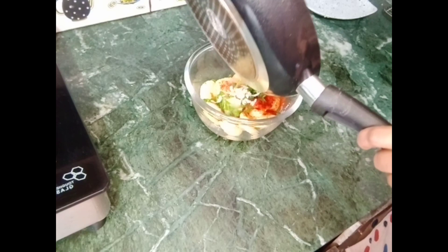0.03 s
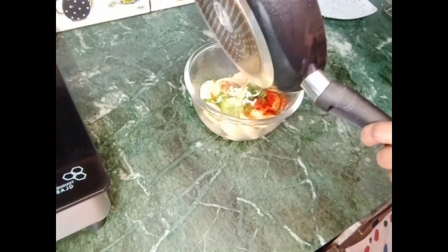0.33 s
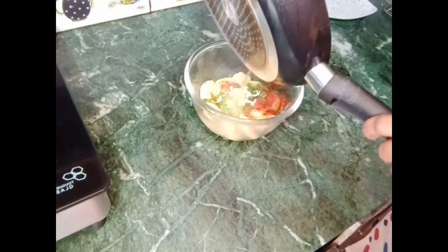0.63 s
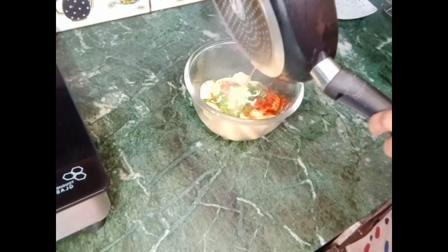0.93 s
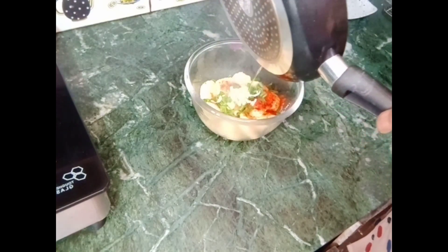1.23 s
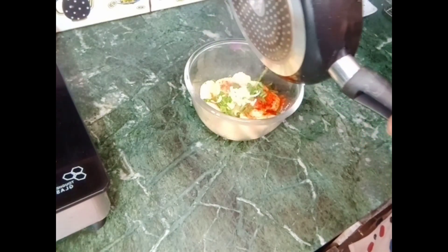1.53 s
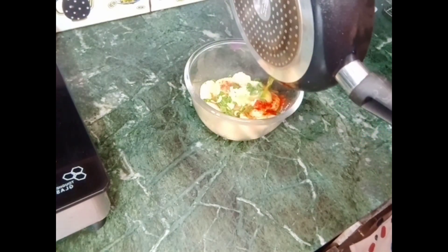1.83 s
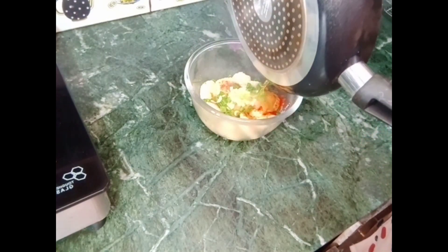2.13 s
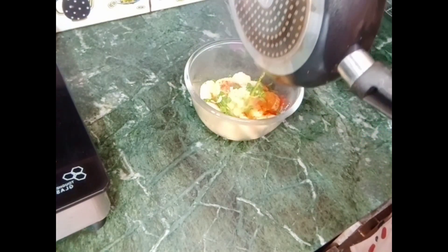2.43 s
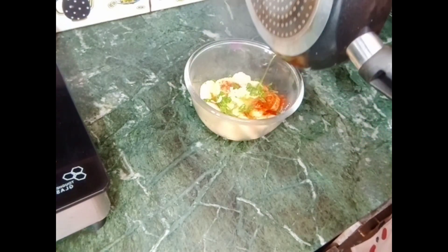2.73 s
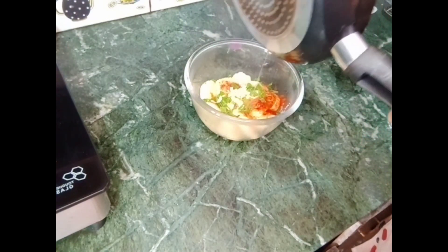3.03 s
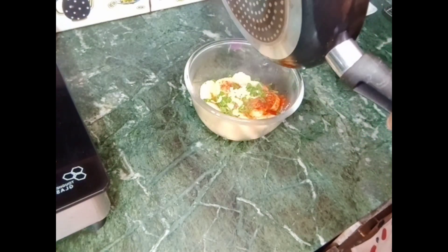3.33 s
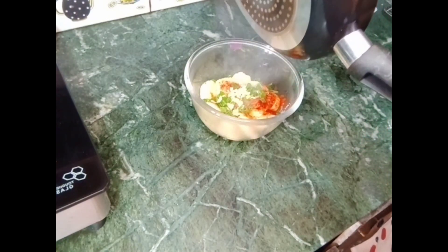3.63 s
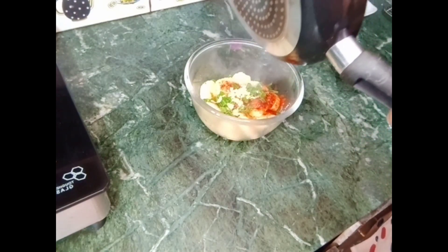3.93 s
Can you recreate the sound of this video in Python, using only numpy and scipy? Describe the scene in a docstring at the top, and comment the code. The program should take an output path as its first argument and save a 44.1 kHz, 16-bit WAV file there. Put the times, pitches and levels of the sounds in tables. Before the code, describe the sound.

Hot oil sizzles loudly as it is poured over chopped seasonings in a glass bowl, heard close in a small kitchen. A soft knock comes early; the sizzle surges with bubbling and pops, then fades to sparse ticks.

```python
"""A bright, dense sizzle: hot oil poured over chopped seasonings in a glass bowl on a stone counter.
Thousands of tiny steam bursts ring the bowl over a lower bubbling, surge with the pour and die away
when it ends, leaving the sparser ticks of the soaked seasonings. Pockets of steam gurgle and larger
drops pop. Something knocks once, the counter takes a soft bump, and the kitchen rumbles faintly."""
import sys
import numpy as np
from scipy import signal
from scipy.fft import rfft, irfft
from scipy.io import wavfile
from scipy.ndimage import uniform_filter1d

SR = 44100
rng = np.random.default_rng(int(sys.argv[2]) if len(sys.argv) > 2 else 0)


def transcribe(signal):
    """Save signal, clipped to [-1, 1], as a 16-bit WAV file at the path in sys.argv[1]."""
    frames = np.atleast_2d(signal).T
    limited = np.clip(frames, -1, 1)
    pcm = np.round(limited * 32767).astype(np.int16)
    wavfile.write(sys.argv[1], SR, pcm)


N = 176400
T = np.arange(N) / SR

# colour of the room rumble: f/Hz, level/dB
RUMBLE_COLOUR = [(20, -35), (40, -23), (65, -18), (100, 3.5), (140, -2), (190, -2.5), (240, -13),
                 (420, -14), (600, -20), (1200, -21.5), (2500, -39), (15000, -57)]
# colour of the steam bursts: f/Hz, level/dB
STEAM_COLOUR = [(200, -40.5), (800, -21.5), (2200, -19), (2700, -14), (3000, -11.5), (4000, -6.5),
                (5000, -2), (6000, -2), (7500, -2.5), (8500, -15), (10500, -18), (13500, -23.5),
                (14700, -8), (15500, -10)]
# resonances of the glass bowl: f/Hz, width/Hz, lift/dB
BOWL_RESONANCES = [(500, 45, 3), (875, 90, 6), (1010, 70, -3), (1120, 55, 6), (1245, 40, 6), (1580, 40, 5),
                   (2050, 420, -5), (2934, 45, 9), (3036, 40, 8), (3167, 40, 6), (3245, 60, -6),
                   (3322, 32, 7), (3436, 32, 8), (3564, 32, 6), (3823, 40, 5), (3960, 60, -3),
                   (4130, 130, 4), (5249, 30, 3), (5509, 30, 3), (5980, 220, 5), (6550, 300, -4),
                   (6970, 40, 3), (7209, 35, 4)]


def amp(db):
    """Decibels to gain."""
    return 10 ** (np.asarray(db) / 20)


def unit(x):
    """Scales to rms 1."""
    return x / np.sqrt(np.mean(x ** 2) + 1e-20)


def read(points, hz):
    """Reads a curve on a log-frequency axis."""
    f, value = np.transpose(points)
    return np.interp(np.log(hz + 1), np.log(f + 1), value)


def level(points):
    """A level curve as a gain for every sample."""
    return amp(np.interp(T, *np.transpose(points)))


def add(mix, s, sound):
    """Mixes a sound in at time s."""
    part = mix[round(s * SR):][:len(sound)]
    part += sound[:len(part)]


def wander(hz):
    """Slow random motion of rms 1, up to about hz."""
    f = np.fft.rfftfreq(N, 1 / SR)
    return unit(irfft(rfft(rng.standard_normal(N)) * f / (f + 2) / (1 + (f / hz) ** 2), N))


def coloured(x, colour, resonances=(), size=8192):
    """Plays x through a minimum-phase filter of unit energy, built from a colour and resonances."""
    hz = abs(np.fft.fftfreq(size, 1 / SR))
    peaks_db = sum(lift / (1 + (2 * (hz - f) / width) ** 2) for f, width, lift in resonances)
    log_gain = np.log(amp(read(colour, hz) + peaks_db))
    ring = np.fft.ifft(np.exp(np.conj(signal.hilbert(log_gain)))).real[:size // 2]
    return signal.oaconvolve(x, ring / np.linalg.norm(ring))[:N]


def above(x, edge_hz):
    """The part of x above a steep edge."""
    hz = np.fft.rfftfreq(N, 1 / SR)
    return irfft(rfft(x) / (1 + (edge_hz / (hz + 1)) ** 10), N)


def bursts(per_s, spread_db, largest):
    """Random clicks, mostly small; the biggest stand spread_db * largest dB above the smallest."""
    sizes = amp(spread_db * np.minimum(rng.exponential(1, N), largest))
    return unit(sizes * rng.choice([-1, 1], N) * (rng.random(N) < per_s / SR))


def spurts(per_s, decay_s):
    """Random surges of rms 1 that start at once and die away."""
    starts = rng.random(N) * (rng.random(N) < per_s / SR)
    surge = np.sqrt(signal.lfilter([1], [1, -np.exp(-1 / (decay_s * SR))], starts) + 1e-12)
    return unit(surge - surge.mean())


def tones(rows, waver, waver_hz):
    """Short wavering tones that swell and fade."""
    out = np.zeros(N)
    for s, length, hz, db in rows:
        pitch = hz * (1 + waver * wander(waver_hz))
        tone = np.sin(2 * np.pi * np.cumsum(pitch) / SR)
        swell = np.hanning(int(length * SR))
        add(out, s, amp(db) * swell * unit(tone)[:len(swell)])
    return out


def patchy(x, depth_db, size=512, bins=9, frames=4):
    """Patches of the spectrum come and go, hundreds of Hz wide and tens of ms long."""
    spectra = signal.stft(x, nperseg=size)[2]
    patches = uniform_filter1d(rng.standard_normal(spectra.shape), bins, axis=0)
    patches = uniform_filter1d(patches, frames, axis=1)
    return signal.istft(spectra * amp(depth_db * unit(patches)), nperseg=size)[1][:N]


def kitchen(x, wet_db, predelay_s=0.003, size=256):
    """Direct sound plus dense reflections that die band by band."""
    # reverb time of the room: f/Hz, t60/s
    reverb_time = [(100, 0.15), (800, 0.28), (4000, 0.32), (15000, 0.21)]
    hz, t, spectra = signal.stft(rng.standard_normal(SR // 2), SR, nperseg=size)
    decay = np.exp(-np.log(1000) * t / read(reverb_time, hz)[:, None])
    tail = signal.istft(spectra * decay * (t > predelay_s), SR, nperseg=size)[1]
    return x + amp(wet_db) * signal.oaconvolve(x, tail / np.linalg.norm(tail))[:N]


def noise_floor(level_db=-85):
    """A very faint, dark bed of noise, different in each channel."""
    return amp(level_db) * np.array([coloured(rng.standard_normal(N), RUMBLE_COLOUR) for _ in range(2)])


def rumble(waver_db=1.5):
    """The low, gently uneven room tone of the kitchen."""
    # rise and fall of the rumble: t/s, level/dB
    envelope = [(0, -45.5), (0.06, -65), (0.55, -68.5), (1.15, -65.5), (1.6, -67.5), (2.05, -73),
                (2.4, -62), (3.2, -63), (4, -62)]
    waver = amp(waver_db * wander(hz=14))
    return level(envelope) * unit(coloured(rng.standard_normal(N), RUMBLE_COLOUR) * waver)


def hollow_tones():
    """Faint hollow tones in the background near the end."""
    # the tones: t/s, length/s, f/Hz, level/dB
    notes = [(3.43, 0.11, 690, -66.5), (3.73, 0.21, 421, -65), (3.835, 0.092, 288, -64)]
    return tones(notes, waver=0.035, waver_hz=40)


def bump(at_s=1.004, push_db=-20.5):
    """One soft push on the counter gives a low thud."""
    # colour of the thud: f/Hz, level/dB
    colour = [(25, -18), (80, 4), (160, 0), (400, -12), (800, -15), (3000, -50)]
    push = np.zeros(N)
    add(push, at_s, amp([push_db]))
    return coloured(push, colour)


def knock(blow_gain_db=4, ring_rise_s=0.0037):
    """A dull knock with a low thump, a short rattle and a hollow ring that swells."""
    # the knock and its rattle: t/s, blow level/dB, ring level/dB
    hits = [(0.2666, -2.5, -12), (0.2682, -6, -14), (0.2694, -9, -30), (0.2885, -21, 0), (0.3435, -14, -16)]
    # colour of the blows: f/Hz, level/dB
    colour = [(45, -36), (115, -4), (300, 1.5), (550, 6), (900, -1.5), (1700, 6.5), (2400, 4), (3300, -0.5),
              (4800, 6), (6200, -24), (14000, -41)]
    # modes of the ring: f/Hz, level/dB, t60/s
    modes = [(286, -44, 0.11), (503, -38.5, 0.2), (842, -24, 0.1), (877, -21, 0.07), (1235, -31, 0.15),
             (2290, -31, 0.24), (2912, -37, 0.14)]
    blows, rings, t = np.zeros(N), np.zeros(N), T[:SR // 3]
    ring = sum(amp(db - 60 * t / t60) * np.sin(2 * np.pi * hz * t) for hz, db, t60 in modes)
    ring *= 1 - np.exp(-t / ring_rise_s)
    for s, blow_db, ring_db in hits:
        add(blows, s, amp([blow_db + blow_gain_db]))
        add(rings, s, amp(ring_db) * ring)
    return kitchen(coloured(blows, colour), wet_db=0) + rings


def frying(clump_db=0.9):
    """The soaked seasonings tick in shifting clusters, sparser and lower, heard as the sizzle fades."""
    # strength of the frying: t/s, level/dB
    envelope = [(0, -53), (2.6, -43.5), (3.1, -50.5), (3.13, -48.5), (3.22, -45), (3.3, -53.5),
                (3.44, -51.5), (3.56, -57), (3.63, -65.5), (3.85, -69), (4, -80)]
    # colour of the ticks: f/Hz, level/dB
    colour = [(500, -22.5), (2300, -17.5), (2700, -9.5), (3100, -7), (3350, -16), (4000, -1), (5300, 2),
              (6200, 0.5), (7400, -10), (8300, -28), (15000, -45)]
    # sharp resonances of the few spots still frying: f/Hz, width/Hz, lift/dB
    spots = [(690, 30, 10), (870, 40, 9), (2859, 40, 6), (3090, 130, 12), (3235, 70, -10), (3736, 50, 6),
             (4058, 55, 9), (4150, 45, 9), (4850, 70, 6), (5060, 50, 4), (5230, 70, 6), (5530, 50, 5),
             (5800, 70, 5), (6000, 80, 9), (6130, 60, 5), (6600, 250, -8), (6900, 70, 7), (7100, 60, 4)]
    ticks = bursts(per_s=1200, spread_db=0, largest=4.1)
    ticks *= amp(clump_db * spurts(per_s=90, decay_s=0.0032))
    return coloured(unit(patchy(ticks, depth_db=2.5)) * level(envelope), colour, spots)


def gurgles():
    """Pockets of steam escape through the oil, each with an unsteady pitch."""
    # steam pockets: t/s, length/s, f/Hz, level/dB
    pockets = [(1.11, 0.039, 1138, -44), (1.335, 0.05, 884, -40), (2.08, 0.031, 555, -44.5),
               (2.955, 0.055, 900, -59)]
    return tones(pockets, waver=0.16, waver_hz=305)


def bubbling(gain_db=-1.5, clump_db=1.3):
    """Larger bubbles churn under the stream and ring the hollow of the bowl."""
    # bubbling where the oil lands: t/s, level/dB
    envelope = [(0,-39.5), (0.25,-42), (0.4,-38.5), (0.53,-44.5), (0.84,-47), (0.96,-50), (1.04,-55),
                (1.13,-42), (1.19,-45), (1.27,-51), (1.36,-38.5), (1.395,-53), (1.43,-45.5), (1.91,-45.5),
                (2.04,-42.5), (2.09,-39), (2.21,-42.5), (2.48,-43), (2.52,-48), (2.56,-43.5), (2.79,-48.5),
                (2.87,-59), (2.98,-60), (3.07,-72), (4.0,-74)]
    # colour of the bubbles: f/Hz, level/dB
    colour = [(100, -22), (300, -18), (500, -7.5), (850, 0), (1400, 0.5), (2200, 3.5), (3200, -8),
              (6000, -18), (12000, -42)]
    bubbles = bursts(per_s=1800, spread_db=1.5, largest=2.8)
    churn = unit(bubbles * amp(clump_db * spurts(per_s=77, decay_s=0.0034)))
    return amp(gain_db) * coloured(churn * level(envelope), colour, BOWL_RESONANCES)


def pops(size=1024):
    """Each larger drop bursts with a short spit of steam in a band of its own."""
    # bursting drops: t/s, peak level/dB, low edge/Hz, high edge/Hz, decay/s
    drops = [(0.2472, -19, 1500, 6000, .0012), (0.3858, -18, 9000, 15000, .0025),
             (0.3862, -14, 1200, 5000, .0025), (0.5168, -16, 3000, 15000, .0015),
             (0.5312, -10, 2500, 15000, .0008), (0.7996, -17, 5000, 15000, .0006),
             (0.911, -17, 3500, 7000, .002), (1.3522, -17, 5000, 15000, .001),
             (1.3903, -18, 4800, 15000, .0012), (1.4792, -14, 3000, 9000, .001),
             (2.1043, -14, 6000, 9000, .003), (2.159, -15, 5500, 9000, .0025),
             (2.3305, -17, 4500, 8000, .001), (2.357, -19, 2000, 9000, .0015),
             (2.4478, -10, 4300, 9000, .001), (2.4706, -16, 4000, 6500, .0007),
             (2.4899, -13, 4800, 9000, .0012), (2.573, -14, 3500, 9000, .003),
             (2.595, -15, 3500, 9000, .0015), (2.6285, -16, 4500, 9000, .001),
             (2.9708, -27, 3000, 8000, .001), (3.1162, -28, 2500, 6000, .0025),
             (3.3338, -35, 3000, 7000, .002), (3.5392, -35, 3000, 6500, .0015),
             (3.941, -49.5, 3500, 7000, .0012)]
    out = np.zeros(N)
    for s, db, low_hz, high_hz, decay_s in drops:
        spit = rng.choice([-1, 1], size) * np.exp(-T[:size] / decay_s)
        spit = coloured(spit, STEAM_COLOUR, BOWL_RESONANCES)[:size]
        spit = signal.sosfilt(signal.butter(3, [low_hz, high_hz], "band", fs=SR, output="sos"), spit)
        add(out, s, amp(db) * spit / abs(spit).max())
    return out


def fizz(spacing_hz=1500, flicker_db=2.13, flicker_hz=45):
    """Tiny bubbles burst in overlapping bands, each band flickering on its own."""
    hz, out = np.fft.rfftfreq(N, 1 / SR), np.zeros(N)
    for centre in np.arange(0, 18000, spacing_hz):
        band = np.cos(np.pi / 2 * np.clip((hz - centre) / spacing_hz, -1, 1))
        bubbles = bursts(per_s=2000, spread_db=2, largest=4.8) * amp(flicker_db * wander(flicker_hz))
        out += irfft(rfft(bubbles) * band, N)
    return unit(out)


def sizzle(gain_db=-1, fizz_db=2, clump_db=0.97, cool_from_s=3.43, cool_db_per_s=26):
    """Steam bursts out of the hot oil in spurts of broad crackle and fine fizz that ring the bowl."""
    # strength of the sizzle: t/s, level/dB
    envelope = [(0.0,-23.5), (0.03,-26.5), (0.33,-27), (0.6,-27.5), (0.68,-29.5), (0.78,-27.5), (0.88,-32),
                (0.91,-28), (0.972,-25.5), (1.0,-38), (1.025,-36.5), (1.05,-32.5), (1.11,-28), (1.2,-26.5),
                (1.235,-29.5), (1.258,-36.5), (1.29,-28), (1.35,-26.5), (1.4,-33.5), (1.44,-26), (1.49,-25),
                (1.54,-28), (1.83,-28), (2.06,-26.5), (2.11,-24.5), (2.22,-27.5), (2.36,-31.5), (2.47,-29),
                (2.52,-29), (2.6,-27.5), (2.66,-31), (2.88,-37), (3.1,-45), (3.19,-43.5), (3.5,-55.5),
                (3.65,-59), (3.85,-62), (4.0,-65.5)]
    # tilt towards the treble: t/s, tilt/dB
    brightness = [(0, -1), (0.3, 0), (0.6, 0), (0.85, 4), (0.93, -1), (1.5, -1), (2.04, 2.5), (2.11, 2.5),
                  (2.36, -0.5), (2.6, 2), (3.08, -1), (3.16, 5), (3.35, 2.5)]
    crackle = bursts(per_s=6000, spread_db=3, largest=3.9)
    steam = crackle + amp(fizz_db) * fizz()
    steam = unit(steam * amp(clump_db * spurts(per_s=370, decay_s=0.0047)))
    treble = above(steam, edge_hz=5900)
    tilt = np.sqrt(level(brightness))
    steam = treble * tilt + (steam - treble) / tilt
    # the oil cools once the pour ends, and its finest fizz goes first
    finest = above(steam, edge_hz=11000)
    cooling = amp(-cool_db_per_s * np.maximum(T - cool_from_s, 0))
    steam = steam - finest + finest * cooling
    return amp(gain_db) * coloured(steam * level(envelope), STEAM_COLOUR, BOWL_RESONANCES)


def dips():
    """A gain that ducks briefly, twice."""
    # dips in level: t/s, half width/s, gain/dB
    notches = [(0.527, 0.0063, -4), (0.9393, 0.0039, -20.5)]
    return amp(sum(db * np.exp(-((T - s) / width) ** 2) for s, width, db in notches))


def scene():
    """The bowl close by in a small hard room, nearly the same in both ears."""
    oil = sizzle() + frying() + bubbling() + gurgles() + pops()
    oil_in_room = kitchen(oil, wet_db=-12) * dips()
    return oil_in_room + knock() + bump() + rumble() + hollow_tones() + noise_floor()


def record(dry):
    """A steep low-pass takes off the very top of the treble."""
    lowpass = signal.firwin(511, cutoff=15650, window=("kaiser", 9), fs=SR)
    return signal.oaconvolve(dry, lowpass[None], "same")


dry = scene()
out = record(dry)
transcribe(out)
```